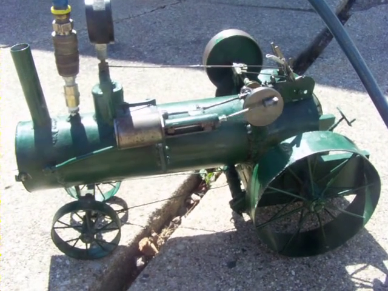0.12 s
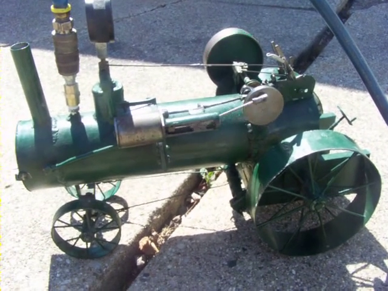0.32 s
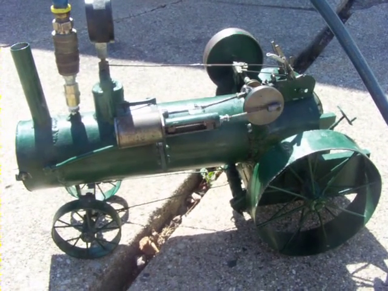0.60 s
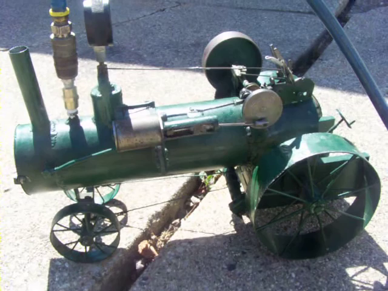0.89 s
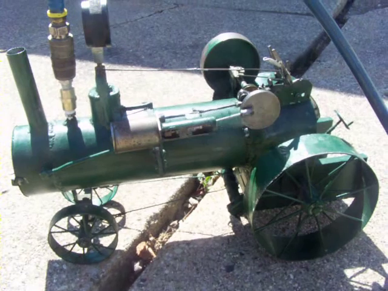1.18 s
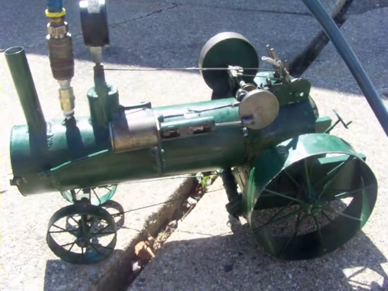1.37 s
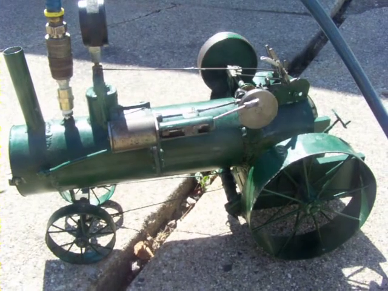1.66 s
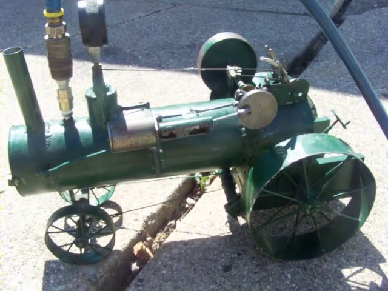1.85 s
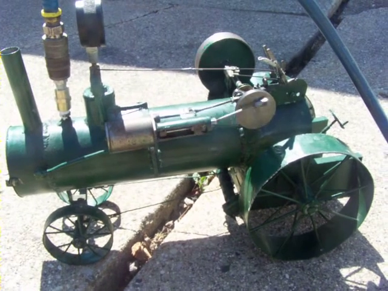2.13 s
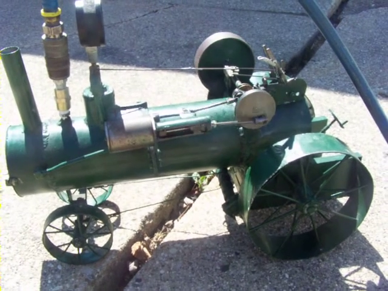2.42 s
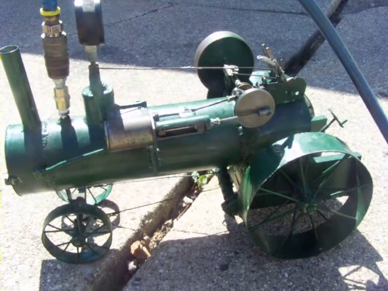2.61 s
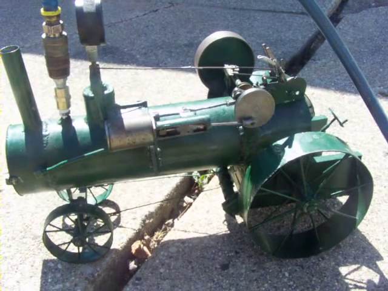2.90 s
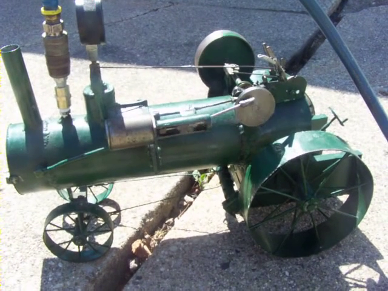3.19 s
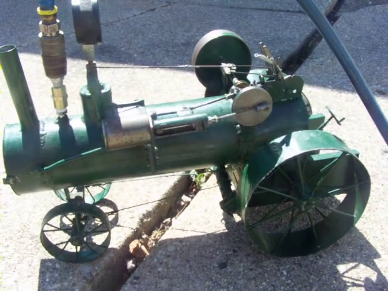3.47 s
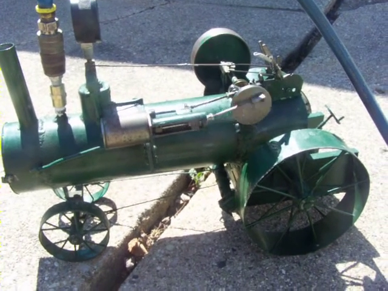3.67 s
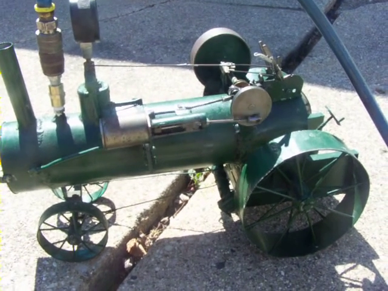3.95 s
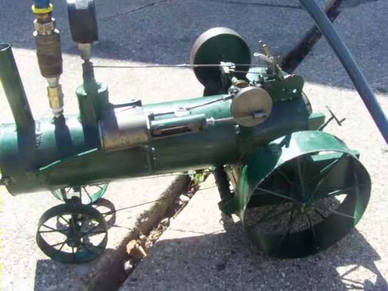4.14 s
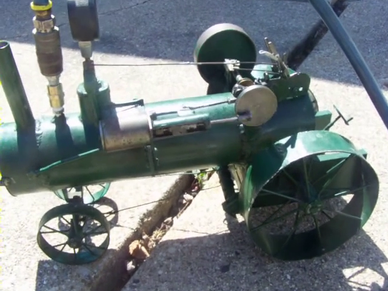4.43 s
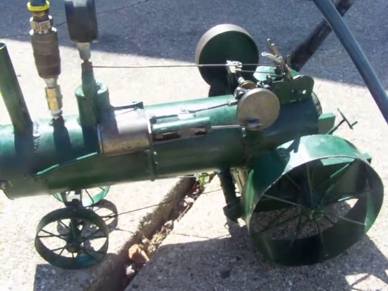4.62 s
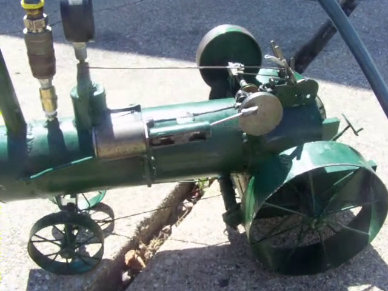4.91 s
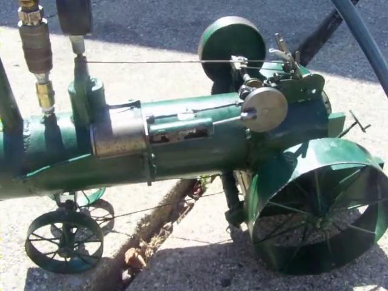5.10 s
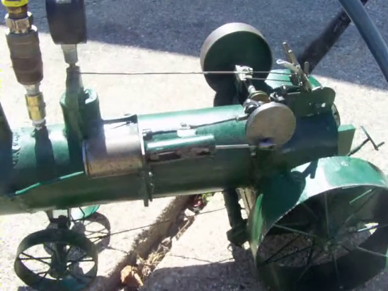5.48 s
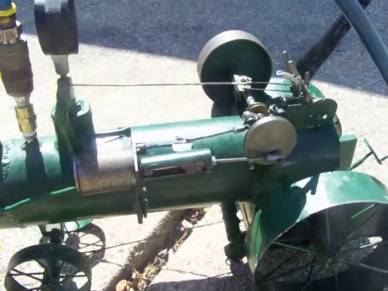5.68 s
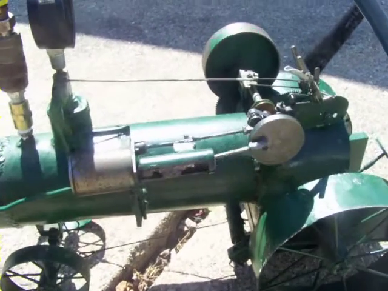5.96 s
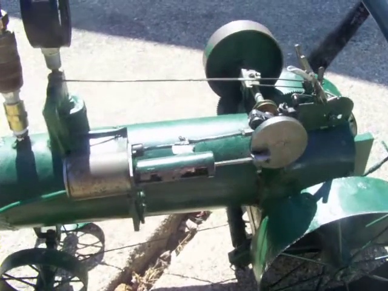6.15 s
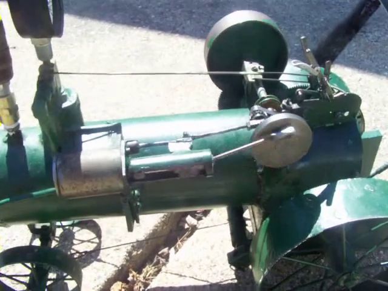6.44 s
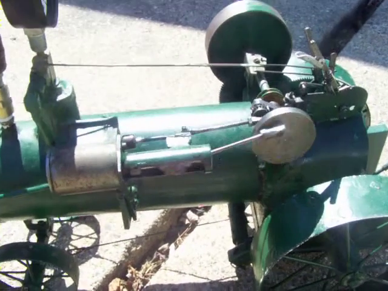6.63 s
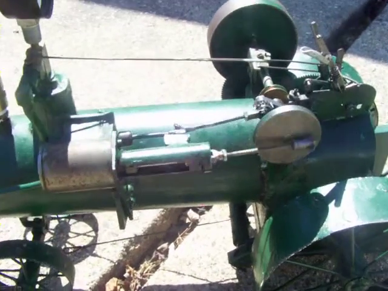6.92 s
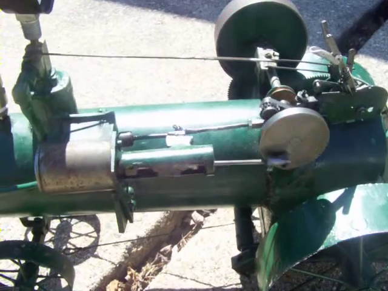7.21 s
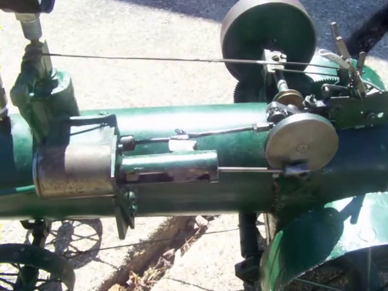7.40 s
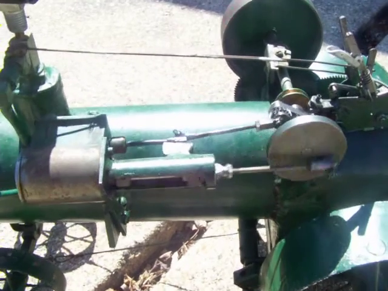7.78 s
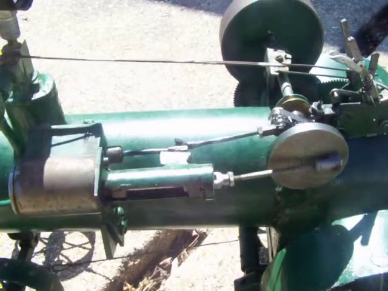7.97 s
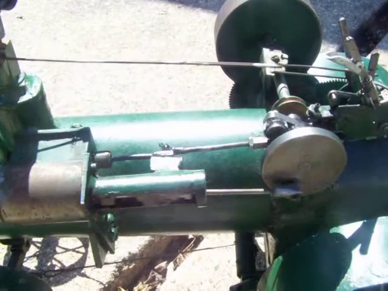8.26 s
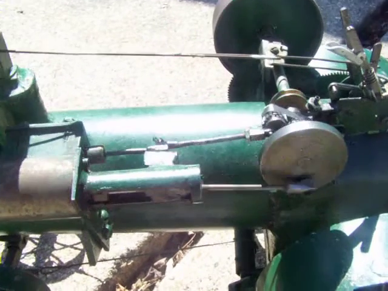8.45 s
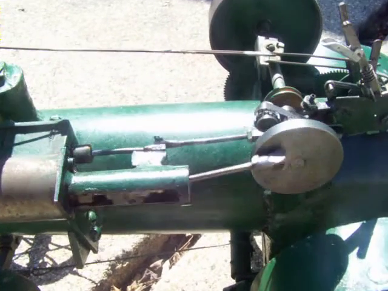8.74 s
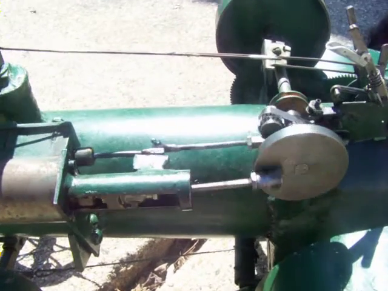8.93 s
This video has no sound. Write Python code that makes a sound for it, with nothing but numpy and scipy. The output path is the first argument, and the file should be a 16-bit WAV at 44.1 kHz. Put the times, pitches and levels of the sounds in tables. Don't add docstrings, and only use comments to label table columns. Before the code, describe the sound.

Close to a small air-driven model engine outdoors: each quick turn brings a hard metallic knock, two short puffs and light valve ticks over hissing leak air. The rhythm runs steadily, about four and a half turns a second. Midway the microphone swings from beside to above, the sound dips, then returns fuller and lower-toned. A few grit clicks and a faint compressor hum sit behind.

```python
import sys
import numpy as np
from scipy import signal
from scipy.fft import rfft, irfft, next_fast_len
from scipy.io import wavfile
from scipy.ndimage import uniform_filter1d, map_coordinates

SR = 44100
rng = np.random.default_rng(int(sys.argv[2]) if len(sys.argv) > 2 else 0)


def magnitude_from_level(level_db):
    exponent = np.asarray(level_db, float) / 20
    return 10 ** exponent


def waveform_to_disk(signal):
    frames = np.transpose(np.atleast_2d(signal))
    scaled = np.clip(frames, -1, 1) * 32767
    samples = np.round(scaled).astype(np.int16)
    wavfile.write(sys.argv[1], SR, samples)


N = 400869


def exhaust(at):
    out_shape = magnitude_from_level(0.5) * burst(0.0013, 0.062, hold=0.006)
    back_shape = magnitude_from_level(2.5) * burst(0.0014, 0.026, hold=0.0037)
    out = blows(at["puff out"], out_shape, alike=0.4, rough_db=-3.5)
    back = blows(at["puff back"], back_shape, alike=0.39, rough_db=3.1)
    blast = soft_cap(body(out + back, axis=2), 0.55)
    u = np.arange(SR // 20) / SR / 0.0019
    push = u * (2 - u) * np.exp(-u)
    thump = np.zeros(N)
    for part, db in (("puff back", -14.5), ("puff out", -19.5), ("knock", -35)):
        thump += magnitude_from_level(db) * train(at[part], push)
    return blast + np.roll(thump, -round(0.0035 * SR))


# start in seconds, level in dB.
CONTACTS = [(0, -6.5), (0.0009, -3), (0.0021, -1.5), (0.0031, -4.5),
            (0.0056, -8), (0.0072, -4), (0.01, -9.5), (0.0135, -11.5)]


def crosshead(at):
    force = np.zeros(SR // 40)
    for s, db in CONTACTS:
        force[round(s * SR)] = magnitude_from_level(db)
    paths = []
    for modes in body_modes():
        knock = np.convolve(force, ringing(modes, axis=3))
        paths.append(train(at["knock"], knock / np.abs(knock).max()))
    same = blend(*paths) / blend(1, 1) ** 0.7
    chatter = train(at["knock"], burst(0.0015, 0.05, hold=0.004)) * rough(1.5, 680)
    return magnitude_from_level(-0.5) * same + magnitude_from_level(-21) * body(chatter, axis=3)


def valve_gear(at):
    shape = magnitude_from_level(2) * burst(0.0011, 0.012, hold=0.0025) + burst(0.0062, 0.023, hold=0.013)
    valve = blows(at["valve"], shape, alike=0.37, rough_db=3)
    rod = blows(at["rod"], shape, alike=0.52, rough_db=3)
    return soft_cap(body(valve + rod, axis=4), 0.4)


def leak(at):
    swell = np.zeros(N)
    t = np.arange(N) / SR
    for part, lead_s, gain in (("rod", 0.03, 1.1), ("valve", 0.015, 0.7)):
        coming = np.array([s for s, _ in at[part]] + [t[-1] + 0.026])
        wait = coming[np.searchsorted(coming, t)] - t
        swell += gain * np.exp(-wait / lead_s)
    swell = uniform_filter1d(swell, 200)
    near_db = curves(VIEW)[1]
    level = magnitude_from_level(-29 + near_db + 0.72 * wobble(25))
    return body(level * (1 + swell) * rough(1.3, 300), axis=5)


def chimney(at):
    shape = burst(0.003, 0.048, hold=0.0038)
    flow = train(at["puff out"] + at["puff back"], shape)
    flow += magnitude_from_level(10.5) * train(at["valve"] + at["rod"], shape)
    flow += magnitude_from_level(-6) * train(at["knock"], shape)
    air = np.roll(flow, -round(0.005 * SR)) * rng.standard_normal(N)
    return magnitude_from_level(-15.5) * filtered(air, lambda hz: resonance(hz, 260, 450) ** 2)


# frequency in Hz, level in dB, t60 in seconds.
SHELL = [(776, -2, 0.3), (866.4, -0.5, 0.28), (1090, 0, 0.16), (1446, 6, 0.18), (556, -9, 0.049),
         (1000, -16.5, 0.037)]


def boiler(at):
    tap = blows(at["tap"], burst(0.00013, 0.004), alike=0.95, rough_db=3)
    knock = magnitude_from_level(-29) * blows(at["knock"], burst(0.0001, 0.005), alike=0.9, rough_db=1)
    puff = magnitude_from_level(-25.5) * blows(at["puff back"], burst(0.00052, 0.014), alike=0.55, rough_db=7)
    force = tap + knock + puff + magnitude_from_level(-62) * rng.standard_normal(N)
    t = np.arange(SR // 3) / SR
    modes = sum(magnitude_from_level(db - 60 * t / t60) * np.sin(2 * np.pi * hz * t) for hz, db, t60 in SHELL)
    ring = signal.oaconvolve(force, modes)[:N]
    ring_level = magnitude_from_level(5.5) * blend(magnitude_from_level(-49.5), magnitude_from_level(-55))
    thud = filtered(force, lambda hz: resonance(hz, 1100, 1500))
    return ring_level * ring / ring.std() + magnitude_from_level(3) * thud


# start in seconds, peak in dB, # frequency
# in Hz, width in Hz, length in seconds.
GRIT_CLICKS = [(2.4703, -8, 5500, 5000, .0001), (3.3655, -1, 2600, 1300, .0002),
               (3.404, -11, 1700, 700, .001), (4.5948, -16, 2600, 900, .001),
               (4.5966, 2.5, 2500, 1100, .0003), (4.6222, -12, 2200, 700, .004),
               (4.632, -15, 850, 250, .003), (4.6445, -16, 1900, 600, .001), (5.456, -11, 2300, 450, .0002),
               (5.465, -5, 2100, 450, .0002), (5.4682, -14, 2250, 220, .0002),
               (7.6115, -4.5, 1900, 550, .0002)]


def grit():
    out = np.zeros(N + SR)
    t = np.arange(SR // 20) / SR
    for s, db, hz, width_hz, length in GRIT_CLICKS:
        crunch = 0.2 * np.exp(-t / length) * rng.standard_normal(len(t))
        crunch[0] = 1
        ring = np.exp(-np.pi * width_hz * t) * np.sin(2 * np.pi * hz * t)
        click = np.convolve(crunch, ring)[:len(t)]
        out[round(s * SR):][:len(t)] += magnitude_from_level(db) * click / np.abs(click).max()
    return filtered(out[:N], lambda hz: (1j * hz / (450 + 1j * hz)) ** 2 / (1 + (hz / 6000) ** 4))


# frequency in Hz, density in dB per Hz.
YARD_COLOUR = [(26, -16), (118, 3.5), (334, -5), (396, -16.5), (770, -6.5), (1100, -8.5), (1430, -29.5),
               (2420, -120)]
# time in seconds, rumble in dB, compressor hum in Hz, hum in dB.
FAR_SOUNDS = [(0, -45.5, 125, -63), (1, -48.5, 123.6, -58.5), (2, -49, 120, -60.5), (3, -47.5, 120.9, -63),
              (3.9, -47, 137, -53), (4.3, -47, 135.8, -48), (5.3, -41.5, 132.3, -50),
              (5.6, -47.5, 141.2, -59.5), (7, -47.5, 133.3, -55.5), (8.2, -48, 136, -51),
              (9.09, -50, 131.3, -64)]


def yard():
    rumble_db, hum_hz, hum_db = curves(FAR_SOUNDS)
    f, level = np.transpose(YARD_COLOUR)
    rumble = filtered(rng.standard_normal(N), lambda hz: magnitude_from_level(np.interp(np.log(hz + 1), np.log(f), level)))
    hum = np.sqrt(2) * np.sin(2 * np.pi * np.cumsum(hum_hz + 1.5 * wobble(7.3)) / SR)
    whine = magnitude_from_level(-58.5) * np.sin(2 * np.pi * np.cumsum(662 + 1.03 * wobble(6.1)) / SR)
    rumble_drift, hum_drift, whine_drift = [magnitude_from_level(1.8 * wobble(rate)) for rate in (5, 6, 3)]
    rumble = magnitude_from_level(rumble_db) * rumble_drift * rumble / rumble.std()
    return rumble + magnitude_from_level(hum_db) * hum_drift * hum + whine_drift * whine


# time in seconds, turns done.
CRANK = [(-.1822, -1), (.0463, 0), (.5017, 2), (.9528, 4), (1.4012, 6), (1.8472, 8), (2.2895, 10),
         (2.7052, 12), (3.5742, 16), (4.4363, 20), (5.3029, 24), (5.9441, 27), (6.7971, 31), (7.2249, 33),
         (7.8613, 36), (8.2836, 38), (8.4953, 39), (9.1343, 42)]
PARTS = {"knock": (0, -3.3, .25, 0, .5), "puff out": (.165, -14, .8, .5, .6), "tap": (.37, -30, 4, .6, .8),
         "valve": (.47, -18.5, 1.1, .3, 1.1), "puff back": (.538, -14.3, 1.1, .8, .5),
         "rod": (.917, -18, 1.2, .7, 1.1)}
# part, extra level in dB, turn numbers.
HARD = [
    ("knock", 2.3, [2, 13, 14, 15, 16, 18, 19, 25, 26]),
    ("knock", 1.2, [0, 3, 7, 24, 31, 34, 38]),
    ("tap", 5, [11, 12, 13, 25, 26, 31, 33]),
]
SKIP_AT_S, SKIP_S = 2.44, 1024 / 44100


def strokes():
    crank_s, turns = np.transpose(CRANK)
    view_s, _, near_db, _ = np.transpose(VIEW)
    crank_s = crank_s + SKIP_S * (crank_s > SKIP_AT_S)
    turn = np.arange(turns[0], turns[-1])
    events = {}
    for name, (angle, db, scatter_db, scatter_ms, share) in PARTS.items():
        chance = rng.standard_normal((len(turn), 2))
        s = np.interp(turn + angle, turns, crank_s)
        s = s - SKIP_S * (s > SKIP_AT_S) + chance[:, 0] * scatter_ms / 1000
        level = db + share * np.interp(s, view_s, near_db) + scatter_db * chance[:, 1]
        for part, extra_db, hard in HARD:
            if part == name:
                level = np.where(np.isin(turn, hard), db + extra_db, level)
        events[name] = [(a, b) for a, b in zip(s, level) if 0 < a < N / SR]
    return events


# frequency in Hz, width in Hz,
# then puff, knock, tick and leak levels in dB.
SIDE_MODES = [(1167, 250, -34.5, -21, -18, -21.5), (1370, 120, -16.5, -17.5, -24.5, -20),
              (1513, 240, -18.5, -34, -19.5, -11), (1688, 360, -21.5, -16.5, -16, -15),
              (1920, 95, -23.5, -16.5, -14, -11.5), (2100, 250, -22.5, -36, -11, -10),
              (2340, 183, -10.5, -14, -18, -11), (2635, 470, -27, -7.5, -8, -31.5),
              (2786, 320, -15, 2, 0.5, -0.5), (2860, 270, -1.5, -26, -17.5, -1.5),
              (3290, 400, -19, -14.5, -16.5, 0), (3283, 98, -13, -15, 0.5, -3.5),
              (3590, 820, -9, -2.5, -7, -3),
              (3780, 98, -13, -3, -17, -6), (4126, 210, -17.5, -16, -4.5, 2.5),
                 (4340, 280, 1, 0, -3, -6), (4600, 110, -9.5, -22, -4, -14.5),
                 (4690, 230, -7, -21.5, -10.5, -3), (5005, 240, -6, -32, -14.5, -6.5),
                 (5296, 130, -8.5, -31, -10.5, -15), (5500, 270, -25, -15.5, -15, -12),
                 (5810, 470, -11.5, -16.5, -29, -13.5), (6190, 180, -20, -22, -15, -13.5),
                 (6780, 590, -43.5, -22, -19, -17), (7110, 430, -22.5, -30.5, -28, -16.5),
                 (7240, 300, -41, -22, -27.5, -21), (7430, 990, -37, -31, -31.5, -23)]
TOP_MODES = [(1034, 140, -23, -19, -14, -22.5), (1390, 124, -3, -26, -34, -8.5),
             (1484, 57, -15.5, -35.5, 0.5, 5), (1740, 550, -12.5, -14.5, -7, -3.5),
             (1936, 113, -20.5, -8.5, 3.5, 3), (2155, 380, -7, 3.5, 0, -10.5),
             (2268, 89, 3.5, -5, -6.5, 6.5), (2420, 290, -6.5, -21, -19, -6),
             (2634, 130, -30.5, 0, -2.5, -13), (2833, 330, -14.5, 2.5, -2, 0.5),
             (3006, 300, -5, 0, -3.5, -6.5), (3335, 100, -33, 1.5, 1, -10.5),
             (3584, 490, -6, -2.5, -26, -1),
             (3780, 300, -3.5, -19.5, 1.5, 1.5), (4040, 170, -11, -5, -13, 4.5),
                (4556, 440, -0.5, -7.5, -4, -4.5), (4355, 330, -2, -3.5, -13, -3),
                (4790, 200, 1, 4, -12.5, -0.5), (5020, 400, -1.5, -13.5, -7, -1),
                (5256, 150, 1.5, -19, -2, -4), (5600, 120, -14.5, -10.5, -16.5, -7),
                (5840, 460, -3, -18.5, -8.5, -6), (6160, 290, -16.5, -12.5, -22, -16.5),
                (6600, 340, -18, -40, -26, -22), (7250, 380, -16.5, -26.5, -29, -15.5),
                (7330, 310, -11.5, -37, -35, -16.5), (7270, 1470, -16, -33.5, -20, -14.5)]


def body_modes():
    return np.array(SIDE_MODES), np.array(TOP_MODES)


def ringing(modes, axis):
    hz = np.fft.rfftfreq(8192, 1 / SR)[:, None]
    m = np.asarray(modes, float)
    humps = magnitude_from_level(2 * m[:, axis]) / (1 + (2 * (hz - m[:, 0]) / m[:, 1]) ** 2) ** 2
    cepstrum = irfft(np.log(np.sum(humps, 1)) / 2)
    cepstrum[1:4096] *= 2
    cepstrum[4097:] = 0
    h = irfft(np.exp(rfft(cepstrum)))[:4096]
    return h / np.linalg.norm(h)


def body(force, axis):
    side, top = [signal.oaconvolve(force, ringing(modes, axis))[:N] for modes in body_modes()]
    return blend(side, top)


# time in seconds, height (0 beside to 1 above), nearness in dB, screening (0-1).
VIEW = [(0, 0, 1.66, 0.32), (1.9, 0, 0.8, 0.22), (4.3, 0, 0.8, 0.08), (4.68, 0.025, -1.5, .05),
        (4.92, 0.54, -7.5, .7), (5.12, 0.5, -4.5, 1), (5.33, 0.49, -1.1, 0), (5.62, 0.78, -1.4, 0),
        (5.95, 1, -3, 0.08), (6.17, 1, -5, 0.22), (6.8, 0.99, -0.35, 0.4), (7.6, 0.99, -0.3, 0.31),
        (9.09, 0.98, -2, 0.28)]


def blend(side, top):
    above = np.clip(curves(VIEW)[0], 0, 1)
    return np.sqrt(1 - above) * side + np.sqrt(above) * top


def blows(events, envelope, alike, rough_db):
    pattern = envelope * np.sign(rng.standard_normal(len(envelope)))
    fresh = train(events, envelope) * rough(rough_db, 800)
    return np.sqrt(alike) * train(events, pattern) + np.sqrt(1 - alike) * fresh


def train(events, shape):
    out = np.zeros(N + len(shape))
    for s, db in events:
        out[round(s * SR):][:len(shape)] += magnitude_from_level(db) * shape
    return out[:N]


def burst(rise, t60, hold=0):
    t = np.arange(SR // 16) / SR
    return (1 - np.exp(-t / rise)) * magnitude_from_level(-60 * np.maximum(t - hold, 0) / t60)


def rough(depth_db, rate):
    x = rng.standard_normal(N) * magnitude_from_level(depth_db * wobble(rate))
    return x / x.std()


def wobble(rate):
    knots = rng.standard_normal(int(N * rate / SR) + 4)
    return map_coordinates(knots, [np.arange(N) * rate / SR])


def curves(rows):
    s, *cols = np.transpose(rows)
    return [np.interp(np.arange(N) / SR, s, c) for c in cols]


def soft_cap(x, ceiling):
    return x / (1 + np.abs(x / ceiling) ** 4) ** 0.25


def resonance(hz, centre, width):
    return 1j * hz * width / (centre ** 2 - hz ** 2 + 1j * hz * width)


def filtered(x, response):
    m = next_fast_len(N + SR // 2)
    return irfft(rfft(x, m) * response(np.fft.rfftfreq(m, 1 / SR)), m)[:N]


def swing(engine):
    above, _, screened = curves(VIEW)
    treble = filtered(engine, lambda hz: 1 / (1 + (5000 / (hz + 1)) ** 8))
    engine = engine + (magnitude_from_level(5 * screened) - 1) * treble
    late = (0.2 - 0.041 * above) * SR / 1000
    share = 0.37 * screened
    echo = map_coordinates(engine, [np.arange(N) - late])
    return (engine + share * echo) / np.sqrt(1 + share ** 2)


def scene():
    at = strokes()
    engine = swing(exhaust(at) + crosshead(at) + valve_gear(at) + leak(at))
    return (engine + chimney(at) + boiler(at) + grit() + yard())[None]


def band_limit(x):
    return signal.sosfilt(signal.butter(12, 15800, fs=SR, output="sos"), x)


def record(dry):
    x = filtered(dry[0], lambda hz: 1 / (1 + (hz / 8700) ** 60))
    mix = np.clip(x, -0.72, 0.72)[None]
    return band_limit(mix)


dry = scene()
out = record(dry)
waveform_to_disk(out)
```